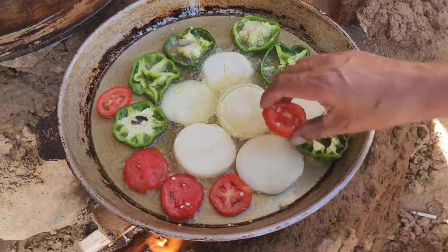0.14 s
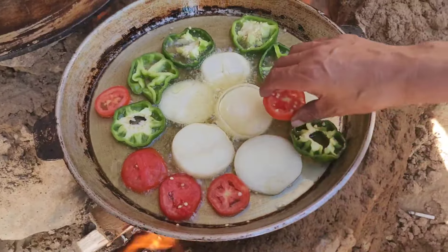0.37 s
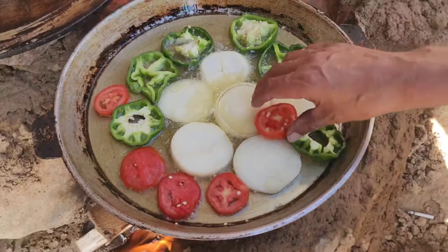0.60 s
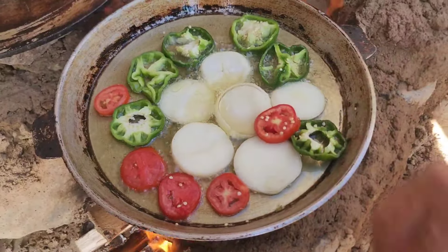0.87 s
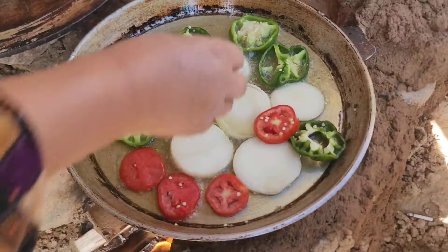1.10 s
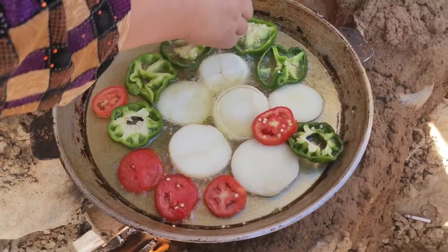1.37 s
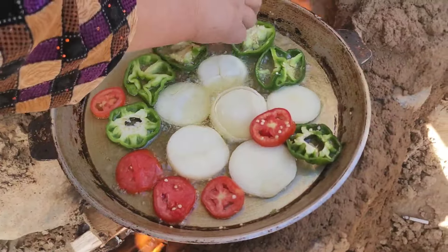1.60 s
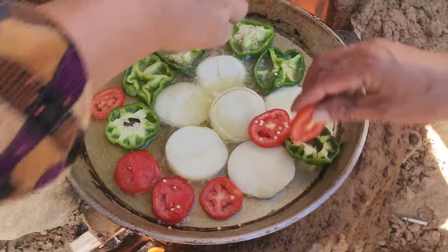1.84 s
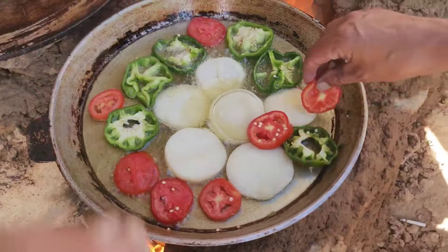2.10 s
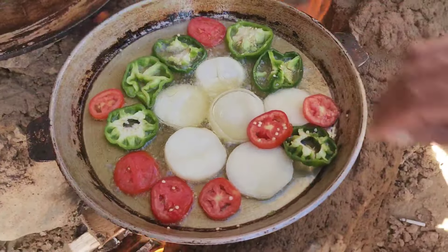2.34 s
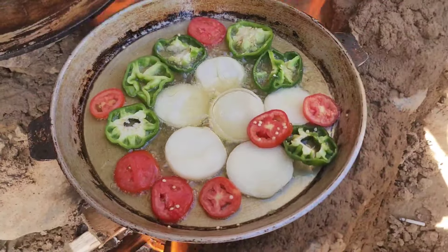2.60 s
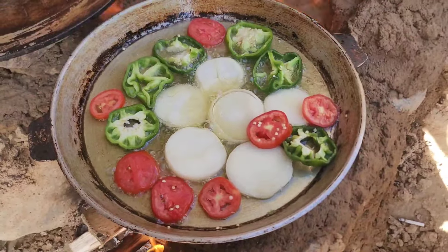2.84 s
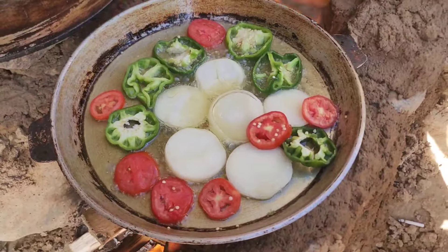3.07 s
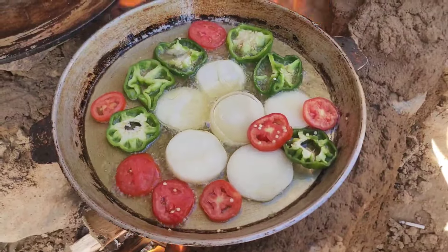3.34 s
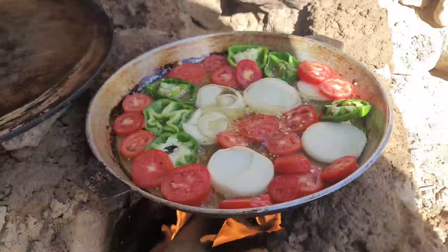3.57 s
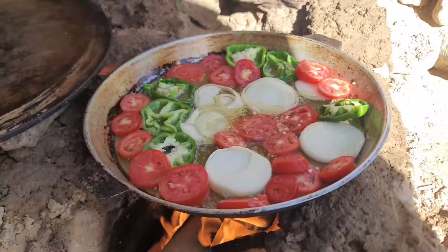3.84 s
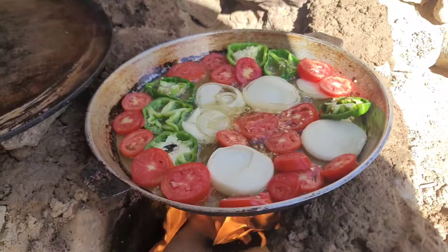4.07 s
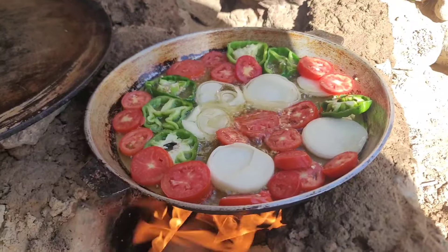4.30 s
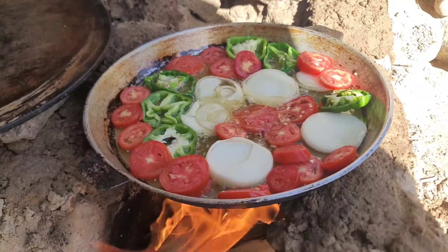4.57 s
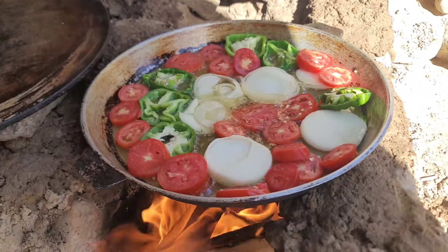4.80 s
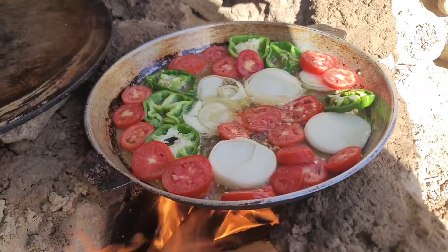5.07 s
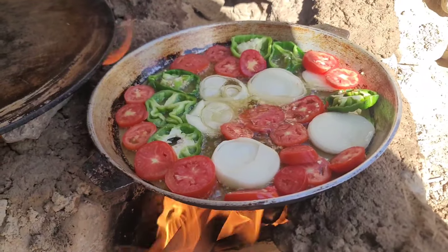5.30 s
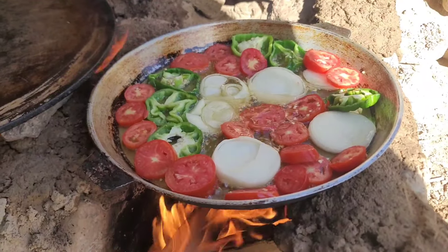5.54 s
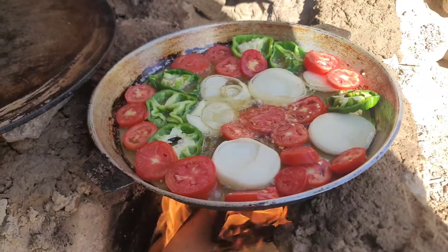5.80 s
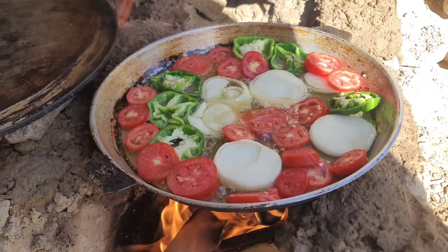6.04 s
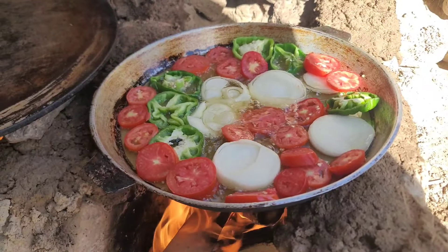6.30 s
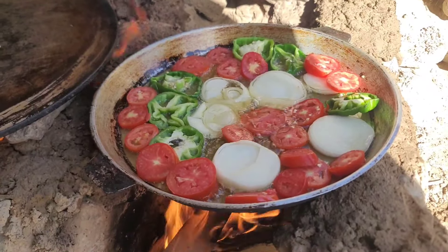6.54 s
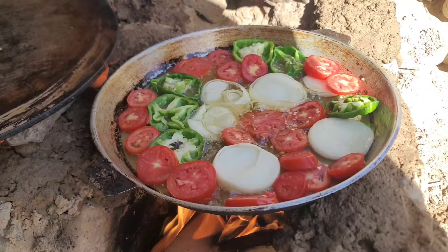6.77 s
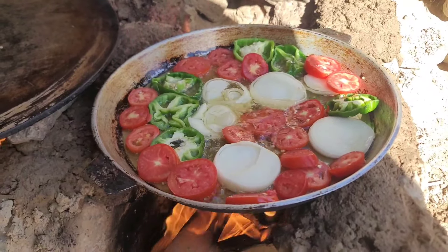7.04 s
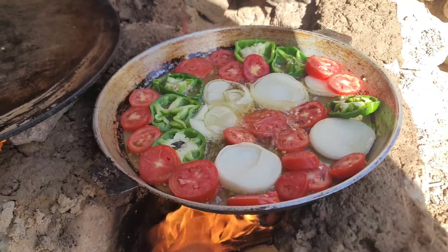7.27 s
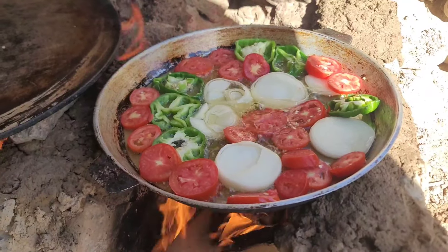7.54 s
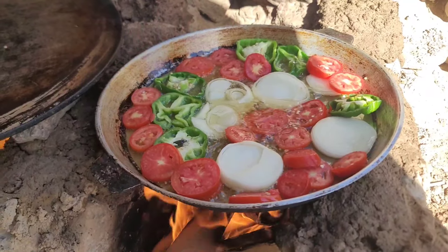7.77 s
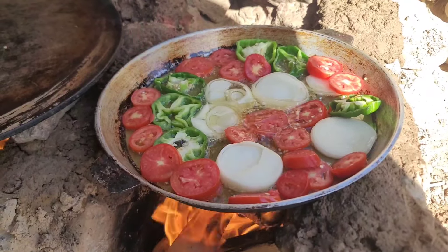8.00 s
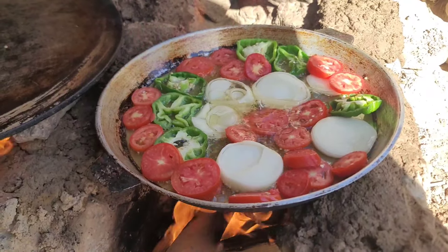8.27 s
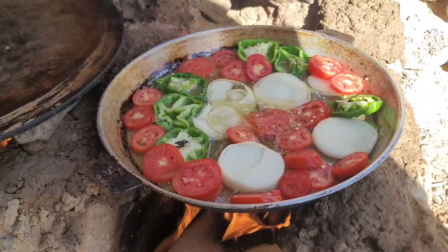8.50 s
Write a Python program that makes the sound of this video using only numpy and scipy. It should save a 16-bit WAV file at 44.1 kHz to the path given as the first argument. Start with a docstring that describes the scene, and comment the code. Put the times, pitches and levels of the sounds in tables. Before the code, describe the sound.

Close stereo sound, dry and outdoors, first from above a shallow pan. From 0 to 1.5 s oil simmers with lively ringing bubbles, low plops and scattered sharp spits, including a strong one right at the start, over a soft low fire roar. At 1.5 s a wet slice lands: a hollow plop and loud spit on the left, then the oil seethes. Frying thickens into a bright, dense, crackling hiss, strongest around 2.1-2.5 s, with rapid pops and further plops near 2.5 and 3.05 s. At 3.35 s it cuts abruptly to silence. At 3.54 s it returns quickly from beside the pan, far calmer: fine, thin bubbling, high little pops and hardly any hiss. A bright spit snaps near 6 s. The fire rumbles and flutters deeply, puffing around 5.3, 5.7 and 7.8 s. The steady simmer continues to the end at 8.6 s.

```python
"""Vegetable slices fry in a shallow pan of oil over a wood fire, heard first from above, then, after a short
silence, from the side. Steam bubbles ring as decaying sines and large pockets plop; droplets spit as short
bursts of noise over a fine noise hiss. A wet slice dropped in makes the oil seethe.
The fire is low noise, roaring and fluttering; two spaced microphones sit in a small housing that rings."""
import sys
import numpy as np
from scipy import signal
from scipy.fft import rfft, irfft, next_fast_len
from scipy.io import wavfile
from scipy.ndimage import uniform_filter1d, map_coordinates

SR = 44100
rng = np.random.default_rng(int(sys.argv[2]) if len(sys.argv) > 2 else 0)


def generate_wav(signal):
    """Clip the signal to [-1, 1] and save it as 16-bit WAV at the path in sys.argv[1]."""
    frames = np.transpose(np.atleast_2d(signal))
    scaled = np.clip(frames, -1, 1) * 32767
    pcm = np.round(scaled).astype(np.int16)
    wavfile.write(sys.argv[1], SR, pcm)


def makeup_ratio(level_db):
    """Linear amplitude ratio for a level in decibels (20 dB per factor of ten)."""
    decades = np.asarray(level_db, float) / 20
    return 10 ** decades


N = 380583

SILENCE = (3.348, 3.537)  # from and to, s
MOVE = 3.44  # the microphones go from above the pan to beside it, s
# The fire over time. Each row: time in seconds, roar in dB, deep flutter in dB, upper part of the roar in dB.
FIRE_LEVELS = [(0, -39.5, -53, -52), (.5, -43, -59, -49), (1.2, -45.5, -51, -51), (2.2, -42.5, -65, -57),
               (3.34, -44, -56.5, -51.5), (3.55, -44, -65, -45), (3.9, -40.5, -48.5, -48.5),
               (4.3, -42, -48, -49.5), (4.8, -41, -48, -47), (5.3, -43.5, -41, -50), (5.8, -43, -45, -50.5),
               (6.3, -43.5, -45, -52), (6.8, -47, -48.5, -54.5), (7.3, -42.5, -43.5, -49),
               (7.8, -44.5, -44, -54), (8.63, -42.5, -46.5, -49.5)]
# Spectrum of the roar. Each row: frequency in Hz, relative level in dB per Hz.
ROAR_SPECTRUM = [(35, -27.5), (60, -3.5), (135, -4.5), (200, -6.5), (260, -18), (400, -58)]
# Spectrum of the roar's upper part. Each row: frequency in Hz, relative level in dB per Hz.
UPPER_SPECTRUM = [(150, -37.5), (240, 1.5), (330, -3.5), (450, -22.5), (600, -58.5)]
# Spectrum of the fluttering draught. Each row: frequency in Hz, relative level in dB per Hz.
FLUTTER_SPECTRUM = [(12, -20), (24, 2.5), (45, 2.5), (70, 0.5), (100, 1), (160, -46)]
# Single puffs of the draught. Each row: middle in seconds, rise above the flutter in dB.
PUFFS = [(.54, 11), (5.3, 8), (5.72, 10), (7.66, 10.5), (7.82, 15)]
PUFF_S = 0.03  # half length of a puff, s
# Likeness of the fire in the two microphones. Each row: frequency in Hz, likeness from 0 to 1.
FIRE_ALIKE = [(40, .91), (400, .9)]
# The frying over time. Each row: time in seconds, bubbling in dB, hiss and small spits in dB.
PAN_LEVELS = [(0, -38, -58.5), (.4, -42.5, -53.5), (.65, -38.5, -54.5), (1.2, -40, -58), (1.495, -40, -53),
              (1.515, -38, -41), (1.58, -32, -43.5), (1.64, -35, -44.5), (1.8, -32.5, -45), (2.1, -29, -41),
              (2.4, -28.5, -40), (2.7, -31.5, -39.5), (3.0, -33, -39.5), (3.341, -31, -43.5),
              (3.55, -44.5, -59), (3.75, -43, -66), (4.1, -42, -61), (4.6, -41.5, -60.5),
              (5.0, -41.5, -62.5), (5.4, -41, -59), (6.1, -42, -60.5), (6.65, -42, -64.5),
              (7.5, -41.5, -61), (8.1, -42, -61), (8.63, -41.5, -62.5)]
# Strength of bubbles from above. Each row: pitch in Hz, relative level in dB.
FROTH_ABOVE = [(400, -51), (650, -10.5), (950, -5), (1400, -8), (2300, 0), (3200, -0.5), (5000, -2),
               (7500, -23)]
# Strength of bubbles, and of the murmur, from the side. Each row: pitch in Hz, relative level in dB.
FROTH_BESIDE = [(400, -11), (650, -6), (950, -8.5), (1400, -6.5), (2300, -8), (3200, 1), (5000, -2),
                (6800, -20.5), (9000, -57)]
# Spectrum of the murmur from above. Each row: frequency in Hz, relative level in dB per Hz.
MURMUR_ABOVE = [(400, -22), (800, -3.5), (1400, 7), (2400, 9.5), (3600, 5.5), (6500, -9), (9000, -34)]
# Likeness of the murmur in the two microphones. Each row: frequency in Hz, likeness from 0 to 1.
PAN_ALIKE = [(600, 0.5), (1400, 0.3), (3000, 0.1), (6000, 0.17)]
POPS_DB = (-2.5, -10)  # longer-ringing pops against short snaps, from above and from the side
FINE_DB = -7  # the fine froth against the seething
MURMUR_DB, SURGE_DB = -12, 3  # base of the murmur against the seething, and its swing with the surges
MERGE = .36  # growth of the murmur, dB per dB of harder seething
LEAD_S = .00006  # the bubbles reach the left microphone this much earlier, s
# Colour of spits and hiss. Each row: frequency in Hz, relative level in dB.
SPRAY_COLOUR = [(1500, -33), (4000, -5), (6000, -2.5), (7600, -9), (12500, -4.5), (15000, -10),
                (16500, -12)]
TREBLE_LEAN = (1.6, 6.6)  # spray, left over right in dB, from above and from the side
FLURRY_DB, FLURRY_RATE = 1.8, 25  # swing of the small spits' flurries in the calm, and their knots a second
# The loudest spits. Each row: start in seconds, starting level in dB before colouring,
# its lower part against that in dB, left over right in dB.
LOUD_SPITS = [(0.0722, -6.5, -32, -2), (0.2773, -15, -2, 1), (0.43, -25.5, 5.5, -1), (0.507, -17, -15, 1),
              (0.6005, -22, -6, 5), (0.8104, -16.5, -1, 3), (0.8025, -32, -5, 0), (0.9916, -18.5, -3, 0),
              (1.0569, -20, -13, 1.0), (1.3377, -19, -7, -5), (1.379, -12.5, -5, 1), (1.503, -6, 3, 15),
              (1.7466, -9.5, -6, -1), (1.785, -13, -8, -4), (1.873, -17, -3, 6), (1.8815, -7, -7, -1),
              (1.9705, -23, 2, -6), (2.144, -13, -17, 3), (2.161, -9, -23, -1), (2.289, -13, -13, 8),
              (2.423, -13, -21, 6), (2.5266, -7.5, 3.5, 2), (2.61, -13, -22, 8), (2.69, -10.5, -22, 6),
              (2.716, -18, -15, 2.5), (2.735, -18, -23, 11), (2.9942, -12, -12, 1), (3.0083, -11, -14, 7),
              (3.151, -12, -7, -5), (3.271, -8, -5.5, 3.5), (4.642, -17.5, -8, 6), (5.208, -21, -11, 6),
              (5.987, -8, -30, 5), (6.392, -24, -16, -2), (6.896, -29, 3, 13), (7.384, -28.5, 8, 7),
              (7.418, -27, -2, 6.5), (7.777, -21.5, -6, 8), (8.033, -23, -10, 5), (8.395, -24.5, 1, 10)]
# Colour of a spit's lower part. Each row: frequency in Hz, relative level in dB.
THUMP_COLOUR = [(200, -32.5), (600, -8), (1200, -2.5), (3000, 1.5), (5000, -6), (8000, -28.5), (12000, -29)]
# The biggest bubbles. Each row: start in seconds, peak in dB before the housing, pitch in Hz,
# left over right in dB, cycles of ringing (held within 4 to 40).
BIG_BUBBLES = [(0.1157, -12, 1490, 0, 26), (0.16, -19.5, 2780, -3, 24), (0.172, -22.5, 2260, 3, 23),
               (0.2382, -20.5, 2820, -5, 46), (0.417, -29.5, 1940, -11, 31), (0.4492, -21, 2100, -3.5, 20),
               (0.457, -24, 2750, -3, 33), (0.567, -29, 2840, -5.0, 21), (0.5821, -22, 2100, -3.5, 31),
               (0.603, -23, 2280, 1, 37), (0.642, -23, 2000, -10, 15), (0.652, -20.5, 2360, 1, 14),
               (0.6655, -21, 2400, -0.5, 25), (0.688, -25, 2380, 0, 15), (0.7088, -21.5, 1830, -8, 36),
               (0.77, -21, 1650, -3, 21), (0.8073, -19, 2680, -2.0, 18), (0.8714, -24, 2000, -1.5, 41),
               (0.922, -21.5, 2110, 2, 33), (0.948, -20, 2730, -1, 14), (1.0109, -19.5, 1630, 2, 24),
               (1.046, -19, 3060, -5, 17), (1.1382, -19, 1250, 0, 14), (1.1824, -23.5, 2950, -6, 20),
               (1.215, -31, 2650, -8, 28), (1.257, -11.5, 2730, -4, 9.4), (1.3694, -17, 2650, -5, 14),
               (1.459, -17.5, 2320, 1, 19), (1.648, -22, 2600, -5, 26), (1.312, -25, 2100, 3, 42),
               (1.7453, -18.5, 2490, -1, 26), (1.944, -16, 2000, 2, 22), (2.0993, -18.5, 1340, 0, 14),
               (2.145, -21, 2360, 2, 22), (2.222, -14, 2230, 1, 18), (2.283, -22, 2330, 5, 32),
               (2.3266, -16, 2400, 2, 14), (2.358, -16, 2330, 3, 28), (2.3831, -15.5, 1370, -0.5, 13),
               (2.441, -14, 2780, -3, 20), (2.5245, -10, 2670, -1, 17), (2.5513, -15, 2290, 3, 23),
               (2.6664, -18, 3200, -8, 27), (2.8394, -13.5, 1990, 1, 10), (3.021, -17, 2040, -0.5, 14),
               (3.046, -9.5, 2270, 1, 12), (3.078, -22, 2450, 0, 23), (3.1514, -26, 1470, 2, 34),
               (3.2205, -19.5, 2300, -0.5, 18), (3.333, -14, 2100, 0.5, 32), (3.617, -25, 2700, 5, 21),
               (3.9448, -26, 3070, -4.0, 18), (4.026, -24, 3130, -2, 22), (4.0547, -29, 2500, 6, 28),
               (4.088, -22, 3350, -1.5, 27), (4.0956, -21, 2780, 3, 18), (4.1045, -23, 3720, -3, 23),
               (4.2647, -28.5, 2630, 0, 34), (4.4036, -21, 3300, 1, 13), (4.454, -25, 2150, 1.0, 16),
               (4.478, -26, 2960, 3, 10), (4.552, -20, 3070, -3, 11), (4.591, -17.5, 3170, 1, 11),
               (4.6225, -22.5, 2230, 2, 23), (4.6964, -22, 3250, 2, 20), (4.711, -26, 2300, 2, 26),
               (4.8014, -26, 2200, 2, 28), (4.8827, -27, 3140, -6, 18), (5.016, -29, 2780, 1, 34),
               (5.1434, -21.5, 2540, 6, 6.1), (5.187, -37, 3370, 1, 24), (5.245, -25, 3100, -2, 22),
               (5.23, -24.5, 3300, -5.0, 23), (5.3143, -25, 1460, 2, 6.4), (5.35, -30, 3500, -2, 18),
               (5.4097, -25.5, 3060, 0, 24), (5.617, -24.5, 2960, 3, 18), (5.7653, -25, 3200, -2, 28),
               (5.798, -29, 2940, 1, 37), (5.8334, -25.5, 2370, 1, 17), (5.9998, -23, 3070, 3, 24),
               (6.0485, -19, 2390, 2, 6.9), (6.0717, -24.5, 3470, -4, 21), (6.104, -26, 2810, 0, 27),
               (6.156, -26.5, 3280, -4, 19), (6.4214, -19.5, 3020, -0.5, 28), (6.643, -27.5, 2860, -9, 34),
               (6.6627, -24, 2420, 0, 9.1), (6.944, -25, 3260, 1, 10), (7.005, -33, 3050, 0, 20),
               (7.0495, -29, 3180, -4.0, 35), (7.0693, -27.5, 3220, -1, 36), (7.1154, -35, 2530, 1, 20),
               (7.119, -16, 3000, 0, 20), (7.1844, -17.5, 2840, 2, 19), (7.364, -31, 2800, 5, 18),
               (7.386, -26, 2960, 3, 18), (7.473, -25, 2960, -3, 30), (7.4919, -21.5, 1900, 1, 16),
               (7.5679, -15.5, 2880, 0, 5.3), (7.6223, -24, 2940, -3, 30), (7.72, -25, 3870, 3, 18),
               (7.9074, -25.5, 1970, 1, 22), (7.9874, -28, 2400, 3, 25), (8.0595, -25, 2720, -1.5, 19),
               (8.125, -23, 4000, 2, 25), (8.1753, -31, 2560, 3, 27), (8.4366, -23.5, 2620, 0, 18),
               (8.561, -23, 2980, 1, 18), (8.5916, -21, 2870, 2, 27)]
AFTER_DB = (-13, -14)  # the smaller bubbles that follow a big one, from above and from the side
# Low plops of large steam pockets. Each row: start in seconds, starting level in dB, pitch in Hz.
PLOPS = [(0.219, -14, 1000), (0.712, -10, 930), (0.913, -14, 980), (1.146, -10.5, 624), (1.146, -17.5, 255),
         (1.504, -34, 298), (1.503, -2.5, 930), (2.001, -12.5, 866), (2.167, -10, 905), (2.378, -17, 870),
         (2.5262, -8.5, 900), (3.042, -6, 1130), (3.078, -11, 1000), (4.048, -21, 885), (5.314, -21, 996),
         (8.213, -20, 950)]
# Peaks and dips of the housing. Each row: centre in Hz, width in Hz, gain in dB.
HOUSING_BANDS = [(930, 170, 2.5), (1167, 170, -2), (1417, 167, 6), (1684, 614, -6), (1990, 133, 2.5),
                 (2220, 92, -9.5), (2400, 86, 2.5), (3200, 85, 4)]
# Colour of the left microphone over the right. Each row: frequency in Hz, difference in dB.
LEFT_COLOUR = [(1200, 0), (3500, -2.5), (9000, 0), (13000, -1)]
# Steep cutoff that ends the treble. Each row: frequency in Hz, gain in dB.
TREBLE_CUTOFF = [(15700, 1.5), (16000, -18.5), (16600, -43.5), (16800, -83)]


def unit(x):
    """Scaled to rms 1."""
    return x / np.sqrt(np.mean(x ** 2) + 1e-20)


def along(points, hz):
    """(Hz, value) points read on a log axis."""
    f, v = np.transpose(points)
    return np.interp(np.log(hz + 1), np.log(f + 1), v)


def control(column, s):
    """One column of the pan's levels at the times s."""
    rows = np.array(PAN_LEVELS)
    return np.interp(s, rows[:, 0], rows[:, column])


def wobble(rate, s):
    """A smooth random curve, rate knots a second (60 at most)."""
    knots = rng.standard_normal(int(N * 60 / SR) + 4)
    return map_coordinates(knots, [s * min(rate, 60)])


def calm(s, busy_db):
    """1 while the oil simmers, down to a half as it seethes: so much happens at once that chance evens out."""
    return np.clip((busy_db - control(1, s)) / 12, .5, 1)


def filtered(x, response):
    """x times a response of frequency."""
    m = next_fast_len(N + 8192)
    return irfft(rfft(x, m) * response(np.fft.rfftfreq(m, 1 / SR)), m)[..., :N]


def pair(spectrum, alike):
    """Stereo noise of rms 1; spectrum and alike are tables over Hz."""
    def mid_side(hz):
        turn = np.arccos(np.clip(along(alike, hz), 0, 1)) / 2
        return makeup_ratio(along(spectrum, hz)) * [np.cos(turn), np.sin(turn)]

    mid, side = filtered(rng.standard_normal((2, N)), mid_side)
    return unit(np.array([mid + side, mid - side]))


def scatter(s, shape, pan_db, lag, size):
    """Sums one short sound per time s in both microphones; left hears it lag seconds after right."""
    out, step = [], np.arange(size)
    for side in (1, -1):  # left, right
        start = (s + side * lag / 2) * SR
        first = np.clip(np.ceil(start), 0, N).astype(int)
        wave = shape((step + (first - start)[:, None]) / SR)  # keeps the fraction of a sample
        wave = wave * makeup_ratio(side * pan_db / 2)[:, None]
        out.append(np.bincount((first[:, None] + step).ravel(), wave.ravel(), N + size + 1)[:N])
    return np.array(out)


def ring(hz, life, db, rise, glide, bend):
    """A bubble: a soft-started sine, 60 dB down after its life, dying faster late if bend > 1; its pitch drifts."""
    hz, life, db, glide = (np.asarray(v)[:, None] for v in (hz, life, db, glide))

    def wave(t):
        decay = makeup_ratio(db - 60 * (t / life) ** bend)
        onset = 1 - np.exp(-t / rise)
        return decay * onset * np.sin(2 * np.pi * hz * t * (1 + glide * t / life))
    return wave


def fire():
    """Flames roar under the pan in lumps; the hot draught flutters deep and puffs, stronger at the right."""
    t = np.arange(N) / SR
    s, roar_db, deep_db, upper_db = np.transpose(FIRE_LEVELS)
    lumps_db = 0.74 * wobble(12, t)  # shared by all three parts
    roar = unit(pair(ROAR_SPECTRUM, FIRE_ALIKE) * makeup_ratio(lumps_db + 2.13 * wobble(30, t)))
    upper = unit(pair(UPPER_SPECTRUM, FIRE_ALIKE) * makeup_ratio(1.1 * lumps_db + 2.1 * wobble(30, t)))
    deep = unit(pair(FLUTTER_SPECTRUM, FIRE_ALIKE) * makeup_ratio(.9 * lumps_db + 2.2 * wobble(9, t)))
    puff_db = sum(db * np.exp(-((t - when) / PUFF_S) ** 2) for when, db in PUFFS)
    left_right = np.array([[-1], [1]])
    roar = roar * makeup_ratio(np.interp(t, s, roar_db) + 0.61 * puff_db + 1.0 * left_right)
    upper = upper * makeup_ratio(np.interp(t, s, upper_db) + .8 * left_right)
    deep = deep * makeup_ratio(np.interp(t, s, deep_db) + puff_db + 2.1 * left_right)
    return roar + upper + deep


def froth(count, low_hz, high_hz, cycles, spread_db, clump_db, rare):
    """Bubbles all over the pan, evened to rms 1 over half seconds; clump_db(s) lets them swell together."""
    draw, bell = rng.random((count, 3)), rng.standard_normal((count, 4))
    s = draw[:, 0] * N / SR
    hz = low_hz * (high_hz / low_hz) ** draw[:, 1]
    # low bubbles vary least in size; a larger rare holds back the biggest
    size_db = -spread_db * np.clip(hz / 2200, .3, 1) * np.log(draw[:, 2] + rare)
    place_db = np.where(s < MOVE, along(FROTH_ABOVE, hz), along(FROTH_BESIDE, hz))
    db = place_db + calm(s, busy_db=-24) * size_db + clump_db(s)
    life = np.clip(cycles / hz * np.exp(0.5 * bell[:, 0]), .001, .009)
    shape = ring(hz, life, db, rise=0.000091, glide=0.11 * bell[:, 1], bend=2.21)
    pan_db = 0.78 * bell[:, 2] * hz / 2000 - 1.2
    x = scatter(s, shape, pan_db, 0.00005 * bell[:, 3] - LEAD_S, size=400)
    power = uniform_filter1d(np.mean(x ** 2, axis=0), size=SR // 2)
    return x / np.sqrt(np.abs(power) + 1e-12)


def bubbles():
    """Fine froth, pops, snaps, dry ticks and a murmur of bubbles too small to tell apart follow the seething."""
    t = np.arange(N) / SR
    seething_db = control(1, t) + 0.22 * wobble(5.9, t)
    # steam escapes in quick surges
    surge = calm(t, busy_db=-21.5) * np.tanh(unit(wobble(24, t) + 4 * wobble(60, t)))

    def clump(depth_db):
        return lambda s: depth_db * np.interp(s, t, surge)

    fine = froth(7000, low_hz=416.0, high_hz=7830, cycles=16.0, spread_db=4.0, clump_db=clump(1.8), rare=0.018)
    pops = froth(1300, low_hz=1470, high_hz=4060, cycles=17, spread_db=3.5, clump_db=clump(5), rare=.03)
    snaps = froth(800, low_hz=1850, high_hz=5000, cycles=11, spread_db=6.5, clump_db=clump(3.5), rare=.09)
    ticks = froth(800, low_hz=900, high_hz=3600, cycles=3.5, spread_db=7.5, clump_db=clump(2.5), rare=0.04)
    murmur = np.where(t < MOVE, pair(MURMUR_ABOVE, PAN_ALIKE), pair(FROTH_BESIDE, PAN_ALIKE))
    # the left microphone hears the murmur earlier
    murmur = filtered(murmur, lambda hz: np.exp(1j * np.pi * hz * LEAD_S * np.array([[1], [-1]])))
    harder_db = seething_db + 54.5  # the harder it seethes, the more pops merge into the murmur
    murmur_db = MURMUR_DB + MERGE * harder_db + SURGE_DB * surge
    distinct = makeup_ratio(np.where(t < MOVE, *POPS_DB)) * pops + snaps + makeup_ratio(-7 + 0.35 * harder_db) * ticks
    distinct = makeup_ratio(-5.0 - 0.2 * harder_db) * distinct
    return makeup_ratio(seething_db) * (makeup_ratio(FINE_DB) * fine + distinct + makeup_ratio(murmur_db) * murmur)


def hiss():
    """The finest spray merges into noise that flickers, nearly unrelated left and right."""
    t = np.arange(N) / SR
    flicker_db = calm(t, busy_db=-14) * (2.8 * wobble(16, t) + 3.2 * wobble(60, t))
    lean_db = np.where(t < MOVE, *TREBLE_LEAN) * [[.5], [-.5]]
    return pair(SPRAY_COLOUR, [(5000, 0.0079)]) * makeup_ratio(control(2, t) + 2.0 + flicker_db + lean_db)


def crack(db, t60, size):
    """Decaying bursts of noise, one per level, a little different in the two microphones."""
    shared = rng.standard_normal((len(db), size))

    def wave(t):
        own = 0.12 * rng.standard_normal(shared.shape)
        return makeup_ratio(db[:, None] - 60 * t / t60) * (shared + own)
    return wave


def spits():
    """Droplets of water explode out of the oil: small ones by chance, in flurries, and loud ones with a thump."""
    draw, bell = rng.random((3500, 2)), rng.standard_normal((3500, 2))
    s = draw[:, 0] * N / SR
    chance_db = FLURRY_DB * wobble(FLURRY_RATE, s) - 3.92 * np.log(draw[:, 1] + 0.0014)
    db = control(2, s) + 8 + calm(s, busy_db=-29.5) * chance_db
    lean_db = 3 * bell[:, 0] + np.where(s < MOVE, *TREBLE_LEAN)
    small = scatter(s, crack(db, 0.015, size=200), lean_db, .0001 * bell[:, 1], size=200)
    s, db, low_db, pan_db = np.transpose(LOUD_SPITS)
    lag = .0001 * rng.standard_normal(len(s))
    loud = scatter(s, crack(db, 0.008, size=400), pan_db, lag, size=400)
    thump = scatter(s, crack(db + low_db, 0.011, size=400), 0.28 * pan_db, 0 * s, size=400)
    bright = filtered(small + loud, lambda hz: makeup_ratio(along(SPRAY_COLOUR, hz)))
    lower = filtered(thump + makeup_ratio(2.5) * small, lambda hz: makeup_ratio(along(THUMP_COLOUR, hz)))
    return bright + lower


def bursts():
    """A big bubble swells open, rings and leaves two smaller ones; large pockets plop."""
    s, db, hz, pan_db, cycles = np.transpose(BIG_BUBBLES)
    bell, later = rng.standard_normal((len(s), 6)), rng.random((len(s), 2))
    life = np.clip(cycles, 4, 40) / hz
    big = ring(hz, life, 0 * s, rise=0.00011, glide=0.091 * bell[:, 0], bend=1.27)

    def sized(t):  # each bubble brought to its listed peak
        wave = big(t)
        return makeup_ratio(db)[:, None] * wave / np.abs(wave).max(axis=1, keepdims=True)

    lag = .00006 * bell[:, 1] - LEAD_S
    out = scatter(s, sized, pan_db, lag, size=900)
    for k in (0, 1):  # the two smaller ones, 2 to 10 ms later
        small_hz = hz * np.exp(0.2 * bell[:, 2 + k])
        small_db = db + np.where(s < MOVE, *AFTER_DB) + 3.3 * bell[:, 4 + k]
        small = ring(small_hz, 0.013 + 0 * s, small_db, rise=0.00019, glide=0 * s, bend=1.44)
        out = out + scatter(s + 0.002147 + 0.0078 * later[:, k], small, pan_db, lag, size=400)
    when, plop_db, plop_hz = np.transpose(PLOPS)
    plop = ring(plop_hz, 5.9 / plop_hz, plop_db, rise=0.00075, glide=0 * when, bend=0.78)
    return out + scatter(when, plop, 0 * when - .8, 0 * when, size=1200)


def housing(hz):
    """Each resonance of the microphones' housing lifts or lowers its own band."""
    response = 1
    for centre, width, db in HOUSING_BANDS:
        band = 1j * hz * width / (centre * centre - hz * hz + 1j * hz * width)
        response = response * (1 + (makeup_ratio(db) - 1) * band)
    return response


def scene():
    """The fire and the frying pan, at both microphones."""
    return fire() + bubbles() + hiss() + spits() + bursts()


def top_cut(x):
    """Nothing passes above the cut-off."""
    return signal.sosfilt(signal.butter(12, 16800, fs=SR, output="sos"), x)


def record(dry):
    """The sound drops to silence and fades back; housing and microphones colour it, a steep cutoff ends the treble."""
    t = np.arange(N) / SR
    fade_out = makeup_ratio(-np.clip((t - SILENCE[0]) * 5000, 0, 200))  # falls 5 dB a ms
    fade_in = np.clip((t - SILENCE[1]) / .013, 0, 1)

    def colour(hz):
        colour_db = along(TREBLE_CUTOFF, hz) + along(LEFT_COLOUR, hz) * [[.5], [-.5]]
        return housing(hz) * makeup_ratio(colour_db)

    mix = filtered(dry * np.maximum(fade_out, fade_in), colour)
    return top_cut(mix)


dry = scene()
out = record(dry)
generate_wav(out)
```